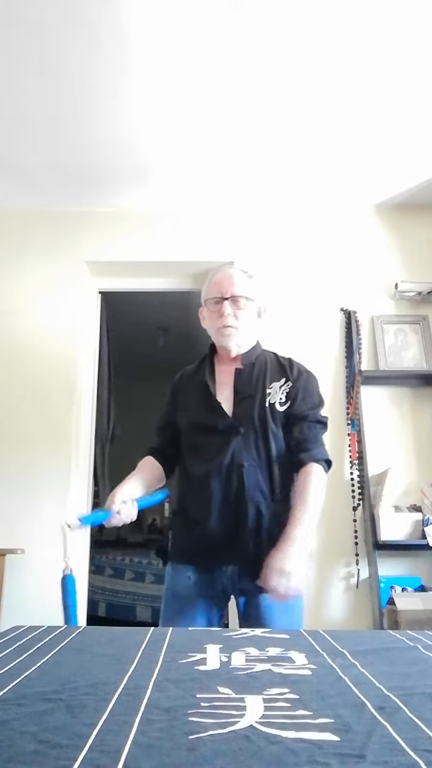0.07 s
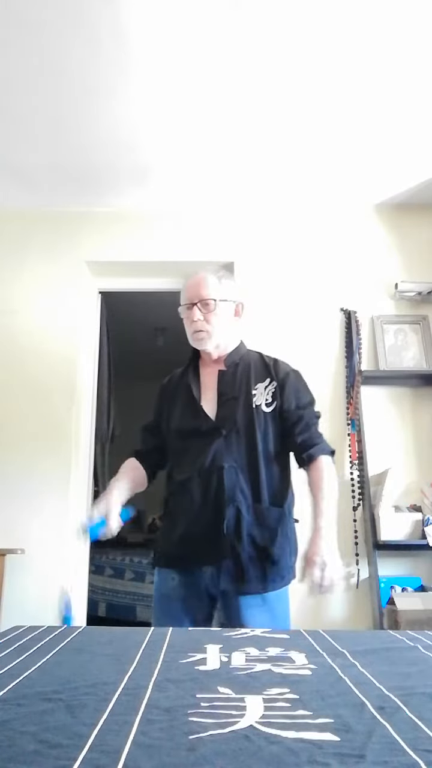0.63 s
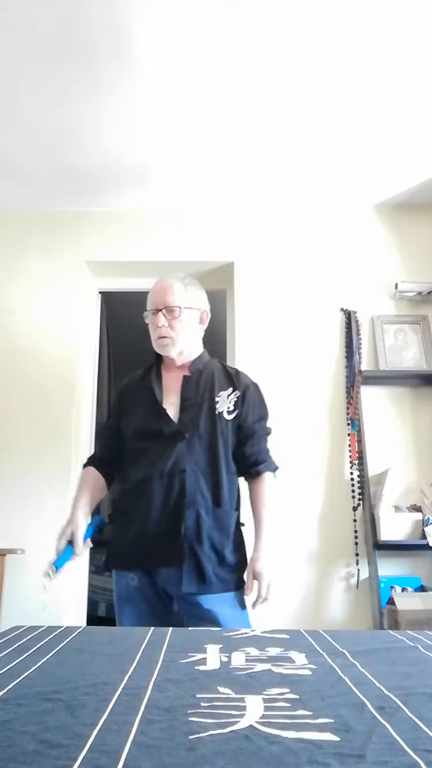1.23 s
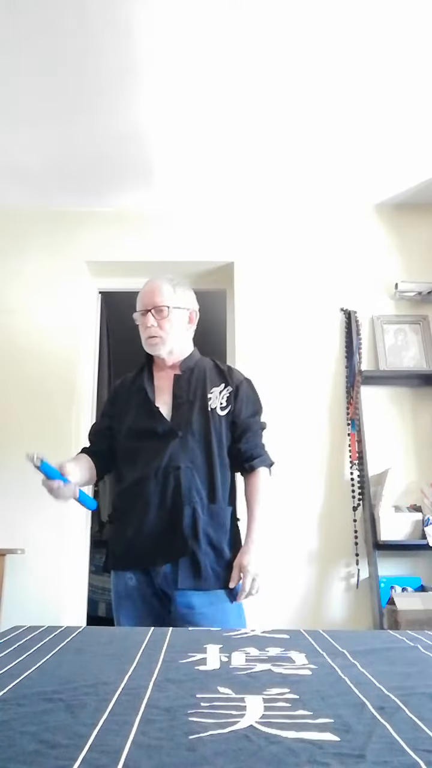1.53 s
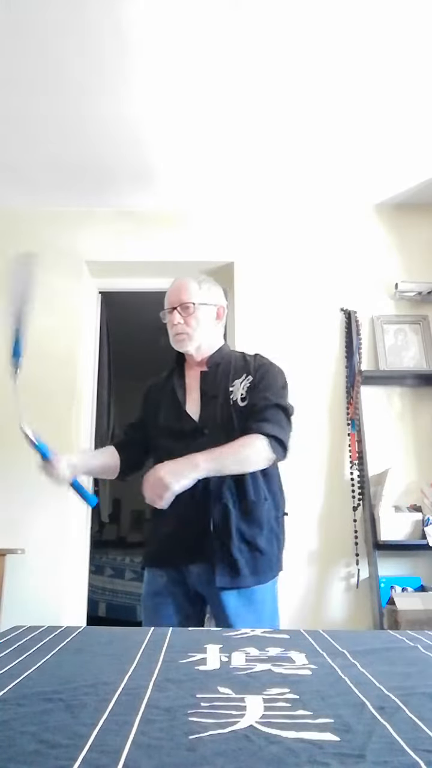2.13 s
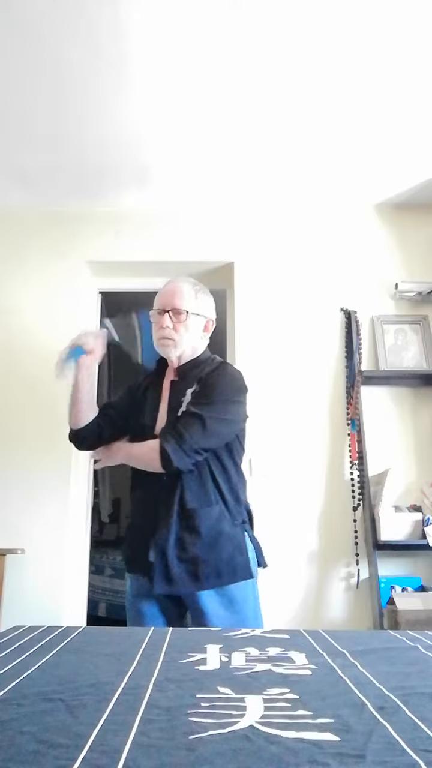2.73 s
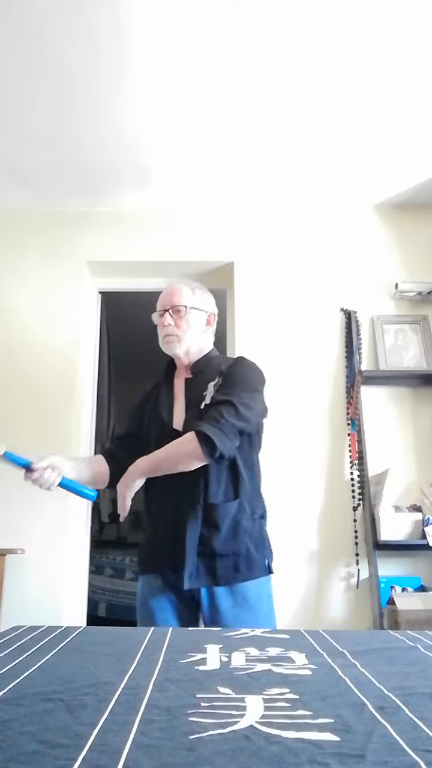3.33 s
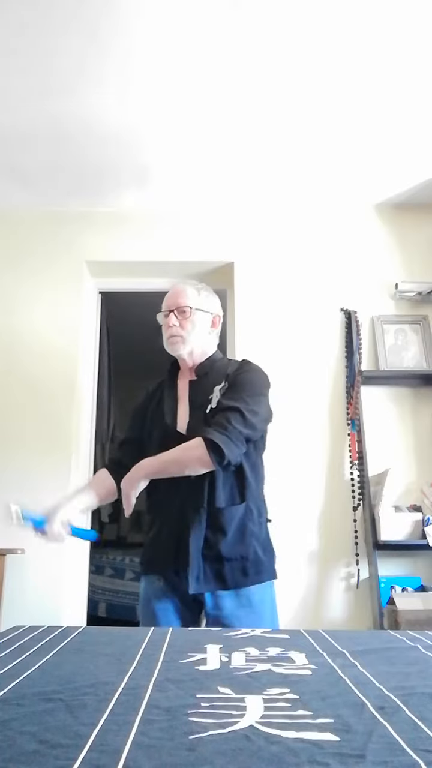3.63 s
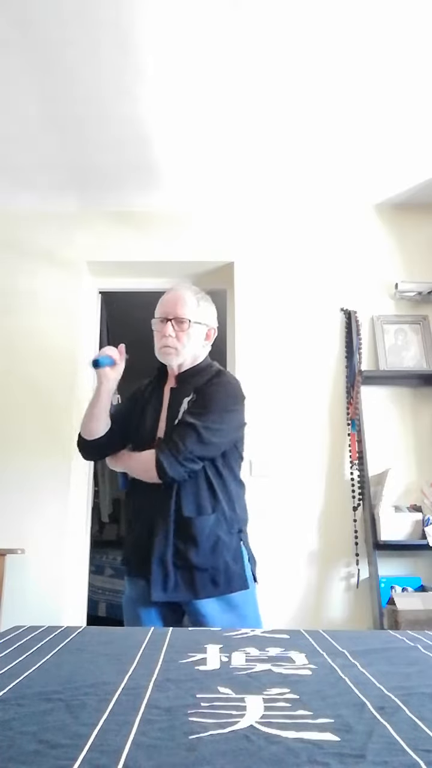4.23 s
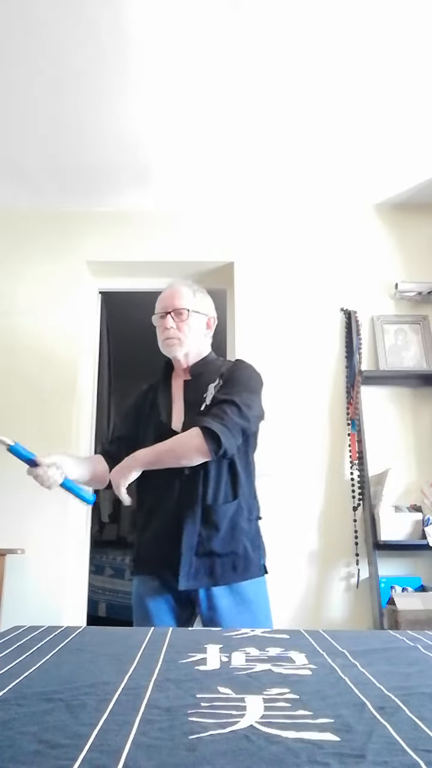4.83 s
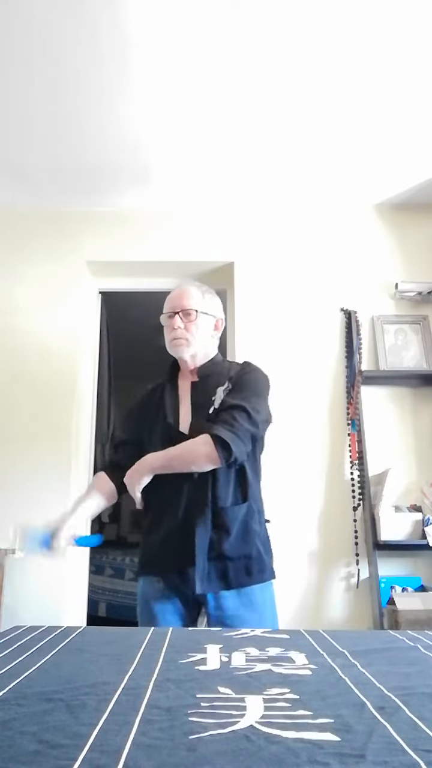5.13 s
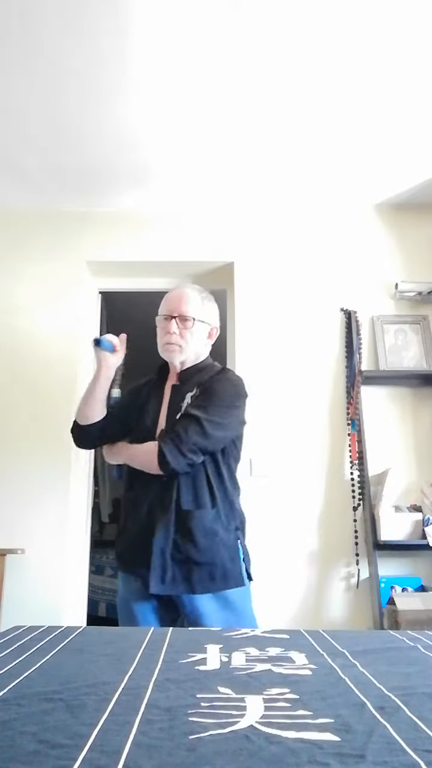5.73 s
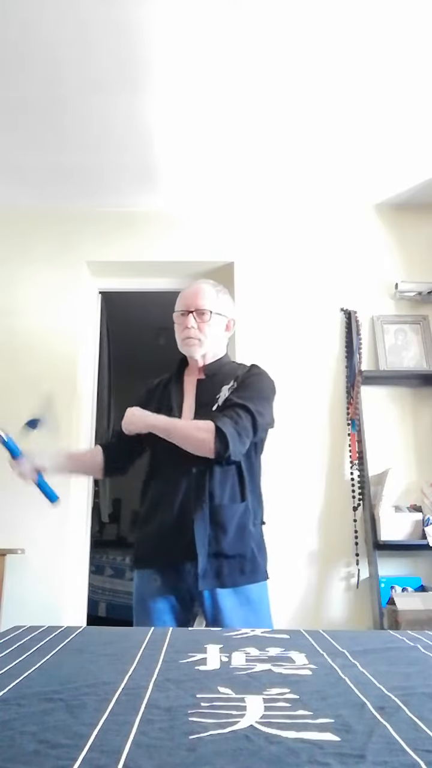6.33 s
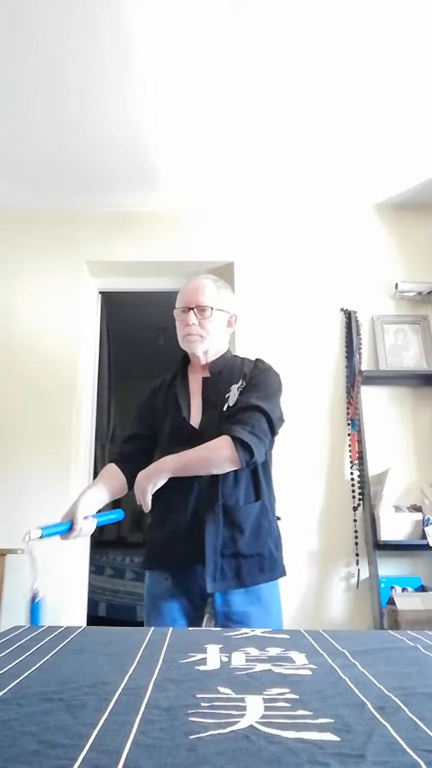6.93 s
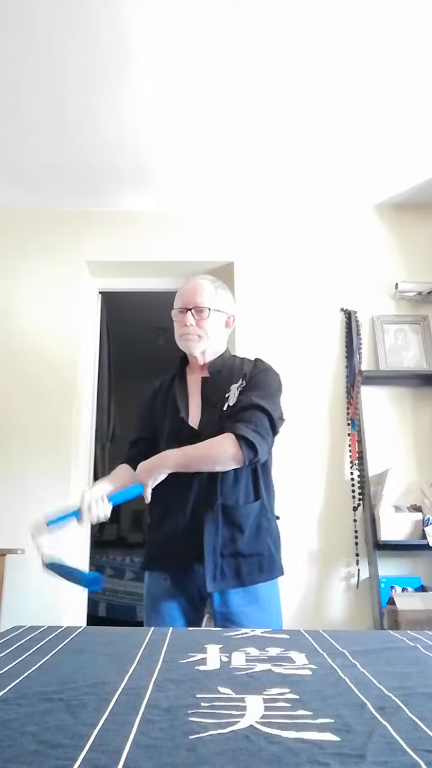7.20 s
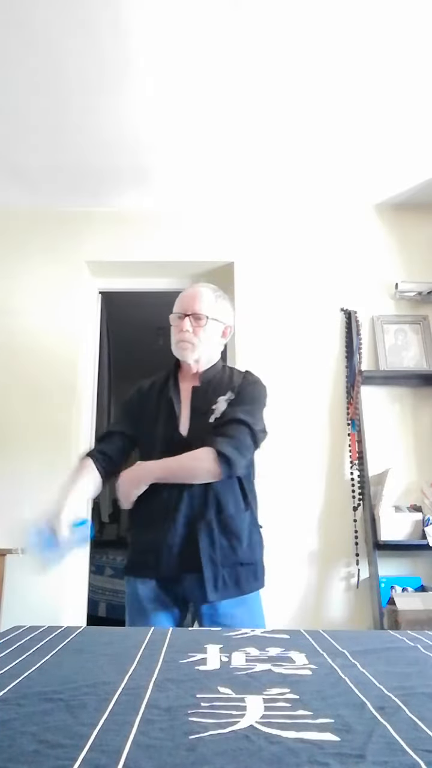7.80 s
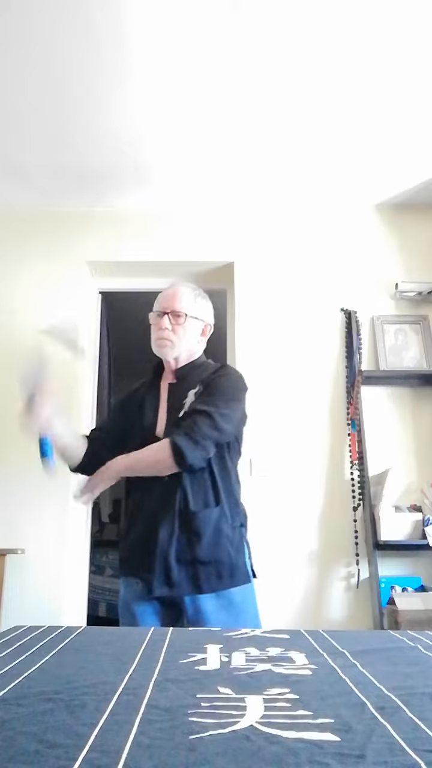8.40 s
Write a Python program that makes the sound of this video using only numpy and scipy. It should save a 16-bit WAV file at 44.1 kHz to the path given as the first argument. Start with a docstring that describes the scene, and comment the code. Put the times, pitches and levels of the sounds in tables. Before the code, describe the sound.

Two sticks joined by a short metal chain are swung in a small, quiet room with a short echo, heard slightly to the right. The links rattle lightly and click from 0.2 to 0.8 seconds, then ease to scattered jingles. From 2 seconds the swings grow stronger: bursts of bright rattling, sharp clacks as the chain snaps taut, and soft swishes of air. The free stick is caught against a sleeved arm with a slap and a dull thud at about 2.9, 4.3, 5.7 and 8.2 seconds. The hardest chain snaps fall near 3.4, 4.9 and 6.2 seconds. The swivels clink now and then and give very brief, high squeaks, clearest around 4.1, 5.5, 6.6 and 8 seconds. After a lull near 7 seconds the swinging resumes, ending in a light rattle. Underneath lie faint hiss, thin whines and a low hum that swells around 4 seconds.

```python
"""Chained sticks in a quiet room

Two sticks joined by a short chain are swung in a small room. The links rattle, ring and clack as they
snap taut, and squeak in their swivels; now and then a swivel cap clinks. The free stick swishes
through the air and slaps against the upper arm when it is caught. Underneath lies a bed of faint
hiss, thin whines and a low, swelling hum."""
import sys
import numpy as np
from scipy import signal
from scipy.fft import rfft, irfft, next_fast_len
from scipy.io import wavfile

SR = 44100
rng = np.random.default_rng(int(sys.argv[2]) if len(sys.argv) > 2 else 0)


def waveform_to_disk(signal):
    """Save audio, clipped to [-1, 1], as 16-bit WAV at the path in sys.argv[1]."""
    frames = np.transpose(np.atleast_2d(signal))
    scaled = np.clip(frames, -1, 1) * 32767
    samples = np.round(scaled).astype(np.int16)
    wavfile.write(sys.argv[1], SR, samples)


N = 373086
TIME = np.arange(N) / SR
TAIL = 2 ** 14   # samples in which one hit dies away
LEFT_LAG = 27   # samples by which the direct sound reaches the left side later
CUTOFF_HZ = 16100

# decay of the room: (frequency [Hz], t60 [s])
ROOM_DECAY = [(100, 0.41), (700, 0.3439), (3000, 0.427), (9000, 0.384), (15000, 0.38)]
# how alike the two sides of diffuse sound are: (frequency [Hz], correlation [0-1])
STEREO_LIKENESS = [(130, .98), (260, 0.97), (500, 0.041), (15000, 0.061)]
# stereo tilt: (frequency [Hz], left minus right [dB])
STEREO_TILT = [(200, 0.5), (700, -4.5), (2400, -5.5), (5000, -5), (9000, -2.5), (13000, -3)]
# colour of the hiss: (frequency [Hz], relative level [dB])
HISS_SPECTRUM = [(25, 2.5), (50, 8), (160, 1.5), (250, 0), (400, -8), (700, -4), (1400, -3), (2100, -9.5),
                 (3300, -7), (5500, -16), (8800, -5), (12000, -24), (15500, -24)]
# faint steady whines, like a small fan's: (frequency [Hz], bandwidth [Hz], level [dB])
WHINE_BANDS = [(457.6, 8.3, -74.5), (934.6, 94, -60), (1024, 35, -65.5)]
# the hum swells: (peak time [s], level [dB], half width [s])
SWELLS = [(.74, -52.5, 0.09), (1.6, -57, .3), (3.95, -47.5, 0.49), (5.25, -58, .12), (8.15, -61, 0.24)]
# strokes of the free stick: (start [s], length [s], rattle [dB], air [dB], change over the stroke [dB])
SWINGS = [(0.172, 0.25, -47, -69, 6), (0.545, 0.25, -42.5, -63, -6.5), (1.266, 0.14, -53.5, -60, -10),
          (1.556, .12, -48, -67, 13), (1.98, 0.17, -42.5, -68, 14), (2.153, 0.18, -36, -49.5, -5),
          (2.599, 0.31, -38, -45.5, 2.5), (3.14, 0.2, -41, -67, 12.5), (3.427, 0.24, -32.5, -47.5, -3.5),
          (3.769, 0.074, -41.5, -52, 4.5), (3.94, .07, -44.5, -57.5, -10), (4.014, 0.16, -28.5, -46, 10.5),
          (4.57, 0.32, -45, -58, 12), (4.898, 0.32, -36, -51.5, -20.5), (5.465, 0.13, -34, -51.5, 7),
          (5.674, 0.19, -39.5, -46.5, -6), (6.024, 0.036, -33, -51.5, 2.5), (6.117, 0.2, -33.5, -46, -3),
          (6.42, 0.021, -29, -66, 8), (6.68, 0.14, -39, -61, -13.5), (7.14, 0.32, -47.5, -67, 7.5),
          (7.436, 0.22, -37.5, -45.5, 1), (7.774, 0.043, -36.5, -51, -6), (7.964, 0.12, -31, -44.5, -2.5),
          (8.336, 0.2, -37, -74, 2)]
# colour of the chain's clicks, with the microphone's bright resonance near 8.9 kHz:
# (frequency [Hz], relative level [dB])
CLICK_SPECTRUM = [(250, -25.5), (600, -17), (1000, -8.5), (1400, -7.5), (2000, -9), (2600, -12),
                  (3200, -4.5), (3700, -8.5), (4300, -6.5), (5900, -12), (7600, -5.5), (8950, 5.5),
                  (10000, -7), (12000, -14), (15500, -24)]
# colour of rushing air and flapping sleeve: (frequency [Hz], relative level [dB])
AIR_SPECTRUM = [(30, -58), (70, 0), (150, -8.5), (240, 1), (300, 1), (400, -1.5), (520, -8), (900, -4.5),
                (2000, -7), (6000, -68)]
# the chain snaps taut: (time [s], ring of the links [dB], clack of caps and stick [dB])
CHAIN_SNAPS = [(.333, -39, -51), (.458, -43, -58.5), (.562, -33.5, -45), (1.661, -38, -79),
               (1.874, -40.5, -56.5), (2.005, -45, -55), (2.064, -52, -52), (2.175, -39.5, -50),
               (2.29, -60, -49), (2.615, -39, -42), (2.674, -35.5, -41.5), (2.75, -35, -40),
               (2.908, -32.5, -45), (3.34, -40, -41.5), (3.410, -35, -47), (3.437, -26.5, -37.5),
               (3.443, -22, -32), (3.583, -30.5, -38.5), (3.750, -31, -37.5), (4.031, -29, -38.5),
               (4.112, -50, -39.5), (4.143, -50, -39.5), (4.224, -29, -35), (4.574, -42.5, -57),
               (4.618, -40, -65), (4.787, -36, -53), (4.887, -35, -37), (4.899, -21.5, -48),
               (4.918, -28.5, -39), (5.060, -38, -41.5), (5.075, -41.5, -43), (5.135, -44, -46),
               (5.472, -31, -37), (5.523, -76, -38), (5.828, -35.5, -45), (5.894, -37.5, -45.5),
               (5.968, -35.5, -53), (6.079, -51, -44.5), (6.162, -36, -41), (6.197, -23, -34.5),
               (6.206, -48, -41), (6.252, -25.5, -33), (6.412, -26, -37.5), (6.438, -32.5, -58),
               (6.659, -34, -48), (7.431, -34, -45), (7.655, -43, -47), (7.775, -31.5, -49),
               (7.957, -31.5, -40), (8.043, -40, -35.5)]
# short metal pings, mostly a swivel cap hit squarely, once (4.095 s) a swivel's brief chirp: (time [s], pitch
# [Hz], level [dB])
CLINKS = [(0.561, 1340, -45), (1.663, 3200, -53.5), (2.219, 3250, -42), (2.289, 1180, -45),
          (4.095, 2110, -40.5), (6.66, 4240, -36.5)]
# a swivel sticks and slips: (time [s], pitch [Hz], level [dB], length [s], left minus right [dB])
SWIVEL_SQUEAKS = [(1.328, 7170, -47, 0.054, -6), (2.122, 11060, -41.5, 0.012, -5),
                  (4.022, 8100, -25.5, 0.028, -8), (4.1035, 9300, -17.5, 0.007, 0),
                  (4.103, 12700, -43, 0.0078, -7), (5.461, 10230, -31.5, 0.0093, -2),
                  (5.520, 8750, -13, 0.013, 0.5), (6.010, 7490, -28, 0.05, -9),
                  (6.581, 4850, -34.5, 0.0082, -12), (6.582, 8770, -19.5, 0.017, -1.5),
                  (7.998, 8350, -21, 0.0097, -3), (7.998, 11000, -32.5, 0.014, -3)]
# the stick is caught under the arm: (time [s], slap [dB], thud [dB], clap [dB])
ARM_CATCHES = [(2.851, -29, -38.5, -42.5), (4.255, -24, -35.5, -47.5), (5.685, -24, -37, -34),
               (8.161, -24, -40, -35)]
# bright slap of the catch: (frequency [Hz], relative level [dB])
SLAP_SPECTRUM = [(300, -13.5), (800, 6.5), (1100, 3.5), (2100, 0.5), (3200, 2.5), (6000, -1.5), (7600, 0.5),
                 (8900, 9), (11500, -10), (15500, -19)]
# deep thud of the arm: (frequency [Hz], relative level [dB])
THUD_SPECTRUM = [(55, -36), (100, -4), (145, 2.5), (215, 0.5), (290, -8.5), (600, -36.5)]
# hollow clap of the sleeve: (frequency [Hz], relative level [dB])
CLAP_SPECTRUM = [(180, -14), (280, -6.5), (380, 0.5), (500, -13), (620, -4.5), (850, -27), (1400, -39),
                 (3000, -48)]


def from_db(db):
    """Decibels to gain."""
    return 10 ** (np.asarray(db) / 20)


def rms_one(x):
    """Scale to unit power."""
    return x / np.sqrt(np.mean(x ** 2) + 1e-20)


def at_hz(points, hz):
    """Read a table on a log-frequency axis."""
    f, value = np.transpose(points)
    return np.interp(np.log(np.maximum(hz, 1)), np.log(f), value)


def convolve(x, response):
    """Filter each channel, keeping the length."""
    return signal.oaconvolve(np.atleast_2d(x), np.atleast_2d(response), axes=1)[:, :x.shape[-1]]


def colour(x, spectrum, size=4096):
    """Minimum-phase EQ with the given spectrum and unit energy."""
    gain = from_db(at_hz(spectrum, np.linspace(0, SR / 2, size // 2 + 1)))
    cepstrum = irfft(np.log(gain))
    cepstrum[1:size // 2] *= 2
    cepstrum[size // 2 + 1:] = 0
    response = irfft(np.exp(rfft(cepstrum)))
    return convolve(x, response / np.linalg.norm(response))


def drift(per_s, size=N):
    """Random wander of spread about 1, with per_s turning points a second."""
    knots = rng.standard_normal(4000)
    return np.interp(TIME[:size] * per_s, np.arange(len(knots)), knots)


def add(track, s, sound, db):
    """Lay a sound in at time s; db is its energy spread over a twentieth of a second."""
    at = max(round(s * SR), 0)
    track[:, at:at + TAIL] += (from_db(db) * np.sqrt(SR / 20 / TAIL) * rms_one(sound))[:, :N - at]


def diffuse(size):
    """Noise from all sides: centred in the bass, wide above."""
    mid, side = rfft(rng.standard_normal((2, size)))
    alike = at_hz(STEREO_LIKENESS, np.linspace(0, SR / 2, len(mid)))
    return irfft(np.sqrt(1 + alike) * mid + np.sqrt(1 - alike) * side * [[1], [-1]], size)


def room(direct_db=-8.0, early_db=6.0, early_s=0.028, first_echo_s=0.0014):
    """Direct sound, dense echoes from the near walls, then a tail that dies band by band."""
    t, field = np.arange(TAIL) / SR, rfft(diffuse(TAIL))
    hz, tail = np.linspace(0, SR / 2, field.shape[1]), 0
    centres, decays = np.transpose(ROOM_DECAY)
    for t60, share in zip(decays, np.eye(len(centres))):
        band = at_hz(np.column_stack([centres, share]), hz)
        tail = tail + irfft(field * band, TAIL) * from_db(-60 * t / t60)
    tail = tail * from_db(early_db * np.exp(-t / early_s)) * (1 - np.exp(-t / first_echo_s))
    response = rms_one(tail) / np.sqrt(TAIL)
    response[[0, 1], [LEFT_LAG, 0]] += from_db(direct_db)
    return rms_one(response) / np.sqrt(TAIL)


def room_tone(hiss_db=-59):
    """A soft, wide hiss with a few narrow bands of noise whining in it."""
    size = next_fast_len(N)
    out = from_db(hiss_db) * colour(diffuse(size)[:, :N], HISS_SPECTRUM)
    draught = diffuse(size)[:, :N]
    for hz, width, db in WHINE_BANDS:
        band = signal.butter(2, [hz - width / 2, hz + width / 2], "band", fs=SR, output="sos")
        out = out + from_db(db) * rms_one(signal.sosfilt(band, draught))
    return out


def hum(hz=68.6, waver_hz=2.26, rest_db=-65, waver_db=2.5):
    """A deep tone that wavers in pitch and level, with a few smooth swells."""
    phase = 2 * np.pi * np.cumsum(hz + waver_hz * drift(4.8)) / SR
    rest = from_db(rest_db + waver_db * drift(7.3))
    swells = sum(from_db(db) * np.exp(-((TIME - s) / width) ** 2) for s, db, width in SWELLS)
    return (rest + swells) * np.sqrt(2) * np.sin(phase)


def swing_envelopes(dangle_db=-66, links_db_per_s=(318.5, 246), air_db_per_s=(219, 222)):
    """Rattle and air envelopes in dB: strokes wind up and run down at the (attack, release) slopes."""
    links, air = from_db(dangle_db) ** 2, 1e-12   # the links never hang quite still
    for start, length, rattle_db, air_db, change_db in SWINGS:
        carry_db = change_db * (np.clip((TIME - start) / length, 0, 1) - .5)
        outside_s = np.clip([start - TIME, TIME - start - length], 0, 1)   # before, after the stroke
        links = links + from_db(rattle_db + carry_db - np.dot(links_db_per_s, outside_s)) ** 2
        air = air + from_db(air_db + carry_db - np.dot(air_db_per_s, outside_s)) ** 2
    return 10 * np.log10(links), 10 * np.log10(air)


def link_spectrum(resonance_db, count=60):
    """The colour of the chain's clicks with the peaks and dips of one point of contact."""
    hz = np.geomspace(250, 15500, count)
    return np.column_stack([hz, at_hz(CLICK_SPECTRUM, hz) + resonance_db * rng.standard_normal(count)])


def rattle(places, level_db, per_s=220, uneven_db=7.5, trim_db=-1.5, jostle_db=1.5, jostle_per_s=45):
    """Links tick against each other, harder as the stick moves; each has its own place and colour."""
    out, force = 0, from_db(level_db + trim_db + jostle_db * drift(jostle_per_s))
    count = int(per_s * N / SR / len(places))
    for walls in places:
        when, size, polarity = rng.random((4000, 3))[:count].T
        strength = from_db(uneven_db * np.minimum(-np.log(size), 3))   # many soft ticks, a few hard
        ticks = np.zeros(N)
        ticks[(when * N).astype(int)] = strength * np.sign(polarity - .5)
        link = colour(walls, link_spectrum(resonance_db=2.0))
        out = out + convolve(rms_one(ticks) * force, link)
    return out / np.sqrt(len(places))


def swish(walls, level_db, trim_db=-1.24, flutter_db=4.5):
    """Air breaks into eddies behind the flying stick and the sleeve."""
    eddies = rng.standard_normal(N) * from_db(level_db + trim_db + flutter_db * drift(30))
    return convolve(colour(eddies, AIR_SPECTRUM), walls)


def contacts(spread_s, light_db, firm_s=0, count=30):
    """The transient of a hit: a thinning spray of light touches and one firm contact at firm_s."""
    delay = np.minimum(rng.exponential(1, count), 4) * spread_s
    clicks = np.zeros(TAIL)
    clicks[(delay * SR).astype(int)] = from_db(light_db) * rng.standard_normal(count)
    clicks[int(firm_s * SR)] = 1
    return clicks


def snaps(places, ring_db=-2.7, clack_db=0.2, knock_db=-4.0, tug_db=-11):
    """The chain jerks taut: links ring, caps clack, the stick knocks and the tug flaps the sleeve."""
    out = np.zeros((2, N))
    knock_top_hz, clack_top_hz = 2400, 6800
    highs = signal.butter(4, clack_top_hz, "high", fs=SR, output="sos")
    mids = signal.butter(4, [knock_top_hz, clack_top_hz], "band", fs=SR, output="sos")
    lows = signal.butter(4, knock_top_hz, "low", fs=SR, output="sos")
    for k, (s, ring, clack) in enumerate(CHAIN_SNAPS):
        touches = convolve(contacts(spread_s=.005, light_db=-22.5, firm_s=.001), places[k % len(places)])
        jerk = colour(touches, link_spectrum(resonance_db=4.5))
        add(out, s, signal.sosfilt(highs, jerk), ring + ring_db)
        add(out, s, signal.sosfilt(mids, jerk), clack + clack_db)
        add(out, s, signal.sosfilt(lows, jerk), clack + knock_db)
        add(out, s, colour(touches, AIR_SPECTRUM), clack + tug_db)
    return out


def clinks(places, t60=0.013):
    """A metal swivel cap hit squarely, or a swivel's brief chirp, gives one tightly damped ping."""
    out, t = np.zeros((2, N)), np.arange(TAIL) / SR
    for k, (s, hz, db) in enumerate(CLINKS):
        ping = np.sin(2 * np.pi * hz * t) * from_db(-60 * t / t60)
        add(out, s, convolve(ping, places[k % len(places)]), db)
    return out


def squeaks(places, waver=0.011, waver_per_s=1300, rough=0.56, glide=0.022, octave_db=-25, beam_db=-10.5):
    """Metal slips on metal in a swivel: a brief, gritty whistle that the room draws out."""
    out, t = np.zeros((2, N)), np.arange(TAIL) / SR
    for k, (s, hz, db, length, pan_db) in enumerate(SWIVEL_SQUEAKS):
        progress = np.minimum(t / length, 1)
        pitch = hz * (1 + waver * drift(waver_per_s, TAIL) + glide * (progress - .5))
        phase = 2 * np.pi * np.cumsum(pitch) / SR
        envelope = np.sqrt(np.abs(np.sin(np.pi * np.sqrt(progress))))
        grip = envelope * np.exp(rough * drift(waver_per_s, TAIL))
        octave = from_db(octave_db) * (2 * hz < CUTOFF_HZ) * np.sin(2 * phase)
        whistle = grip * (np.sin(phase) + octave)
        # high tones carry straight across the room
        beam = from_db(beam_db) * np.array([np.roll(whistle, LEFT_LAG), whistle])
        left, right = convolve(whistle, places[k % len(places)]) + beam
        add(out, s, np.array([from_db(pan_db) * rms_one(left), rms_one(right)]), db)
    return out


def catches(places, slap_db=0.1, thud_db=0.9, clap_db=3.2):
    """The stick lands: the arm thuds, the sleeve claps, and the chain piles up behind it."""
    out = np.zeros((2, N))
    for (s, slap, thud, clap), walls in zip(ARM_CATCHES, places):
        pile_up = contacts(spread_s=.011, light_db=-24.5, firm_s=.003, count=70)
        blow = contacts(spread_s=.014, light_db=-20, count=12)
        add(out, s, convolve(colour(pile_up, SLAP_SPECTRUM), walls), slap + slap_db)
        add(out, s, convolve(colour(blow, THUD_SPECTRUM), walls), thud + thud_db)
        add(out, s, convolve(colour(blow, CLAP_SPECTRUM), walls), clap + clap_db)
    return out


def lean_right(x):
    """Above the bass the stereo image leans to the right."""
    size = next_fast_len(N + TAIL)
    tilt_db = at_hz(STEREO_TILT, np.linspace(0, SR / 2, size // 2 + 1))
    return irfft(rfft(x, size) * from_db(tilt_db * [[.5], [-.5]]), size)[:, :N]


def scene():
    """Hits and movement over the bed, in one room whose echoes differ for five places of the stick."""
    places = [room() for _ in range(5)]
    links_db, air_db = swing_envelopes()
    hits = snaps(places) + clinks(places) + catches(places)
    movement = rattle(places, links_db) + swish(places[-1], air_db)
    bed = room_tone() + hum()
    return lean_right(hits + movement + bed) + squeaks(places)   # squeaks have their own panning


def record(dry, ceiling=0.9):
    """Any peak above the ceiling is clipped, and the top end is cut steeply."""
    high_cut = signal.ellip(10, .2, 80, CUTOFF_HZ, fs=SR, output="sos")
    return signal.sosfilt(high_cut, np.clip(dry, -ceiling, ceiling))


dry = scene()
out = record(dry)
waveform_to_disk(out)
```